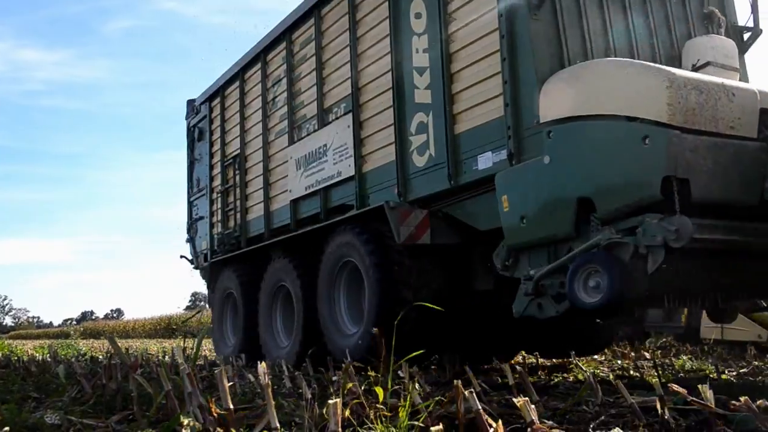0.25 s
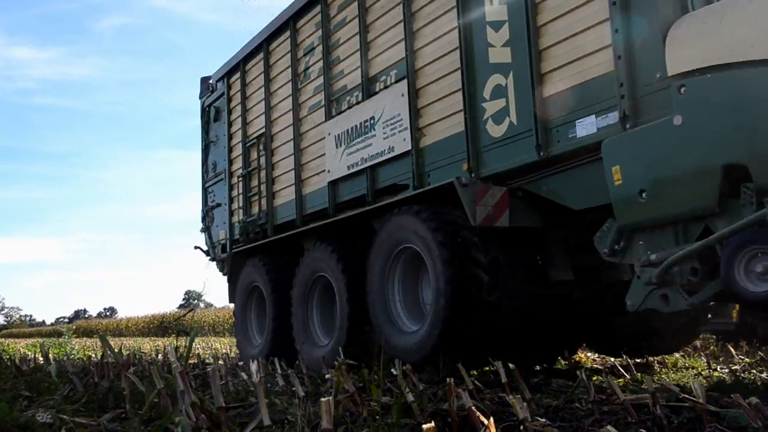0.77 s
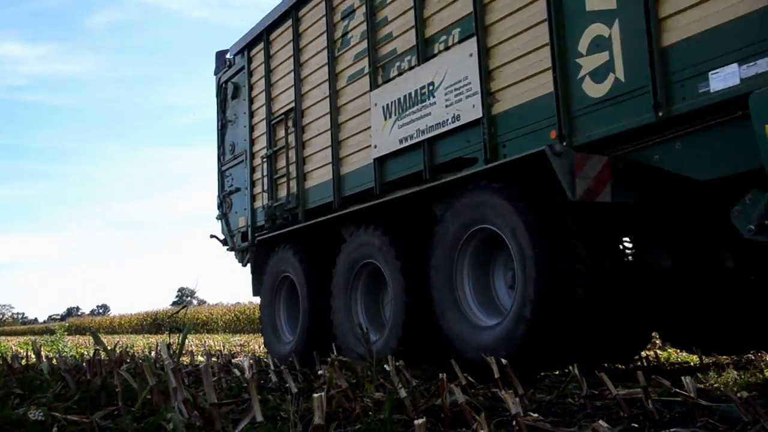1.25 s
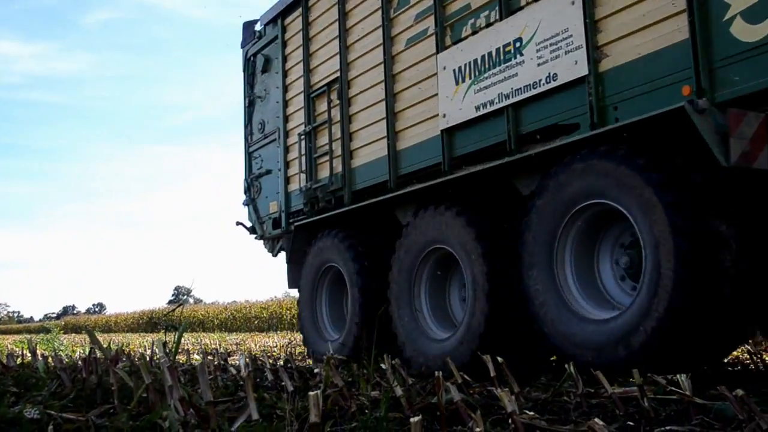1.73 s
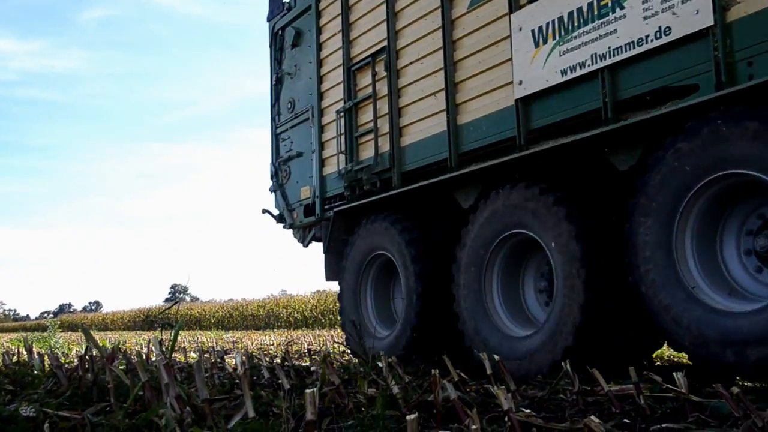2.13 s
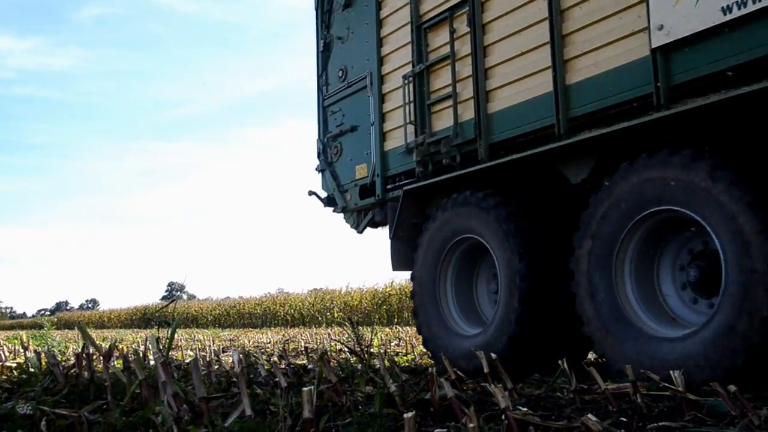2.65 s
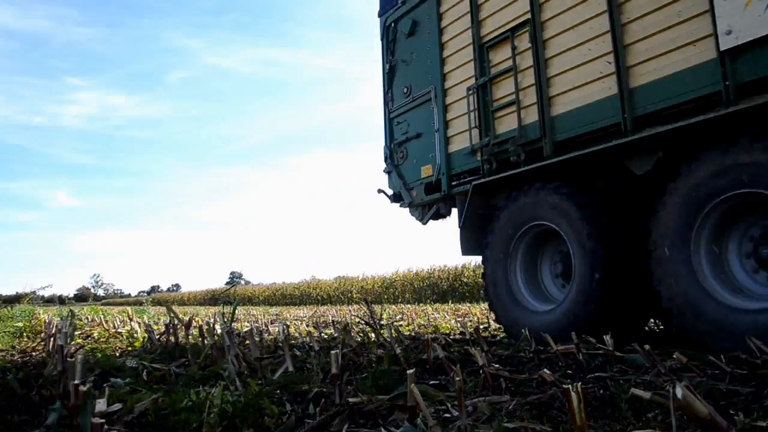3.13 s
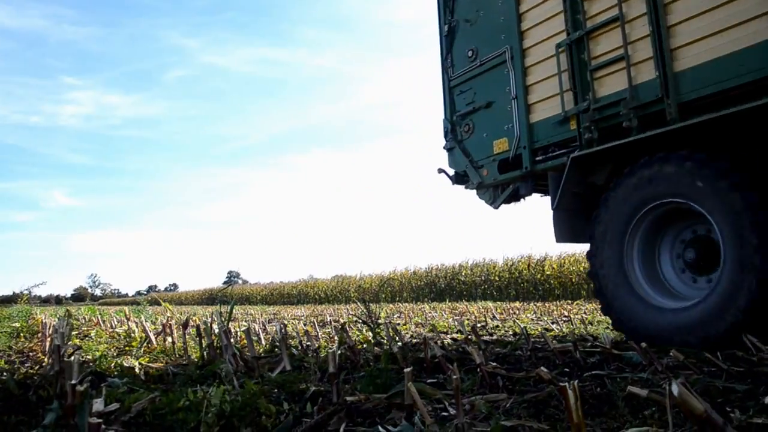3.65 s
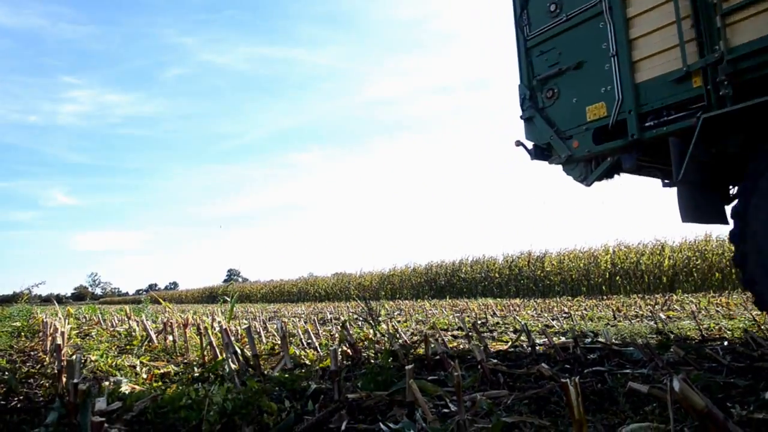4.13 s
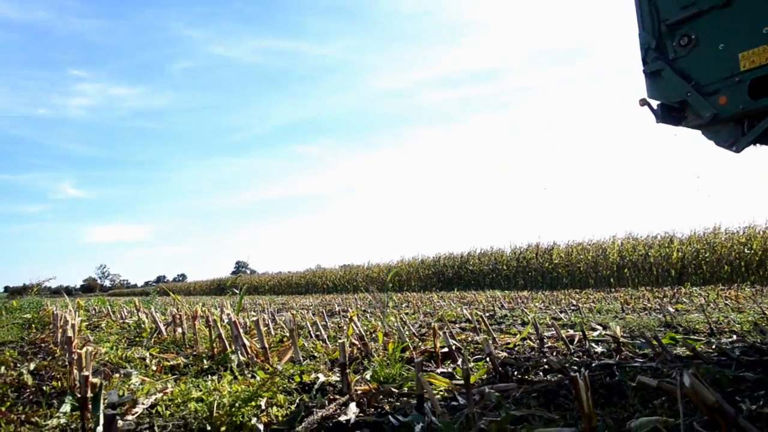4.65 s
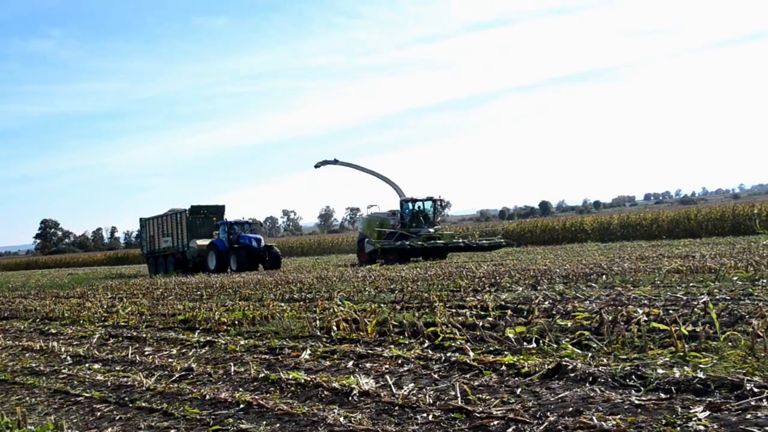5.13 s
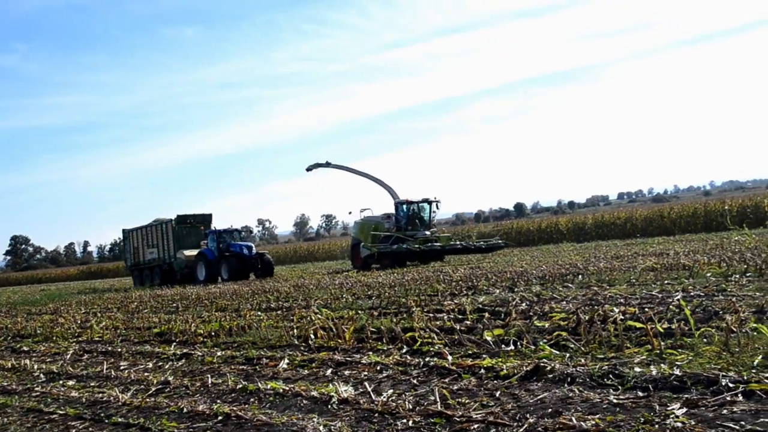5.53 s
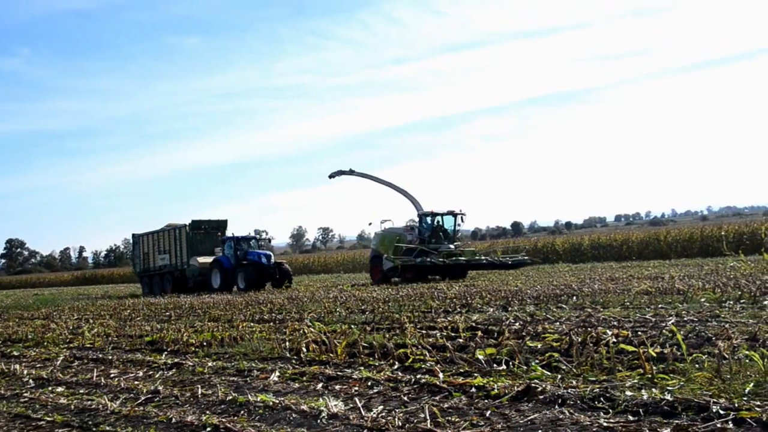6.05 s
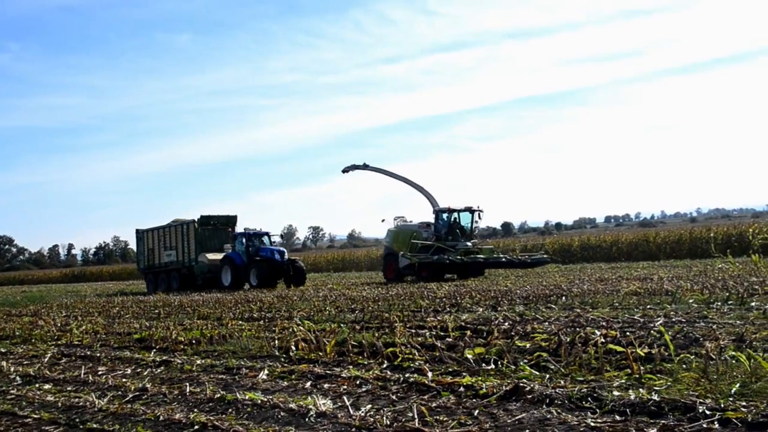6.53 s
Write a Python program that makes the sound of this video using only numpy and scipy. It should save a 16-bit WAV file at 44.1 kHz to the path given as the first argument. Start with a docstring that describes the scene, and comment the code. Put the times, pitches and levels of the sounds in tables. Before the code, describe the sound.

In a maize field, a forage harvester and a tractor hauling a wagon pass close to the microphone. The chopping drum hums unevenly over a diesel roar, the wagon booms hollowly, and dry leaves and stalks crunch and snap under the tyres. The sound cuts off abruptly, then the machines fade back in far away, a dull roar with a higher whine, as wind gusts buffet the microphone.

```python
"""A maize stubble field: a tractor pulls a silage wagon past while a forage harvester chops beside it.
The knife drum hums, the diesel roars, the wagon box booms, leaves and stalks crack under the tyres.
After an abrupt cut the field fades in again with the machines far off, the unloaded drum whining higher,
and gusts of wind thump on the microphone."""
import sys
import numpy as np
from scipy import signal
from scipy.fft import rfft, irfft
from scipy.io import wavfile

SR = 44100
rng = np.random.default_rng(int(sys.argv[2]) if len(sys.argv) > 2 else 0)


def store_wav(level_fs):
    """Save 16-bit WAV to argv[1]."""
    pcm = np.round(np.clip(np.atleast_2d(level_fs), -1, 1) * 32767)
    wavfile.write(sys.argv[1], SR, pcm.T.astype(np.int16))


N = 299439
TIME = np.arange(N) / SR
FREQS = np.maximum(np.fft.rfftfreq(N, 1 / SR), 1)
CUT_S, FADE_END_S = 4.890, 5.281   # the close pass ends; the far view is fully up


def from_db(db):
    """Decibels to gain."""
    return 10 ** (np.asarray(db) / 20)


def unit_rms(x):
    """Scale to unit power."""
    return x / np.sqrt(np.mean(x ** 2) + 1e-20)


def automation(rows):
    """Breakpoints to one curve for each column after the time."""
    times, *columns = np.transpose(rows)
    return [np.interp(TIME, times, column) for column in columns]


def swell(start, length, attack, release):
    """Rise to 1 by the start, hold for the length, fall to 0."""
    return np.clip(np.minimum((TIME - start) / attack, (start + length - TIME) / release) + 1, 0, 1)


def drift(rate_hz):
    """A smooth random wobble, mostly slower than the rate; rms 1."""
    return unit_rms(irfft(rfft(rng.standard_normal(N)) / (1 + (FREQS / rate_hz) ** 2), N))


def equalise(x, curve, notches=()):
    """Shape a signal with an EQ curve and optional narrow notches; rms 1."""
    hz, db = np.transpose(curve)
    shape_db = np.interp(np.log(FREQS), np.log(hz), db)
    for centre, width, depth in notches:
        shape_db = shape_db + depth / (1 + ((FREQS - centre) / width) ** 2)
    return unit_rms(irfft(rfft(x) * from_db(shape_db), N))


def phase(hz):
    """Running angle of a steady or gliding pitch."""
    return 2 * np.pi * np.cumsum(hz * np.ones(N)) / SR


def tone(angle, db):
    """A sine of this rms level."""
    return np.sqrt(2) * from_db(db) * np.sin(angle)


def grains(per_s, spread_db):
    """Random clicks of uneven size and sign; rms 1."""
    sizes = from_db(spread_db * np.minimum(rng.exponential(1, N), 4))
    return unit_rms(sizes * rng.choice([-1, 1], N) * (rng.random(N) < per_s / SR))


def clicks(hits, curve):
    """One short equalised click for each (time [s], peak [dB])."""
    spikes, impulse = np.zeros(N), np.zeros(N)
    impulse[N // 2] = 1
    for s, db in hits:
        spikes[round(s * SR)] = from_db(db)
    click = equalise(impulse, curve)[N // 2 - 200:N // 2 + 201]
    return signal.fftconvolve(spikes, click / click.max(), "same")


def thumps(hits):
    """Each pressure bump dips and swings back within one cycle."""
    out = np.zeros(N)
    for s, db, hz in hits:
        span = slice(max(round((s - .05) * SR), 0), round((s + .05) * SR))
        swing = 2 * np.pi * hz * (TIME[span] - s)
        bump = swing / (1 + (swing * 0.59) ** 2) ** 2
        out[span] += from_db(db) * bump / np.abs(bump).max()
    return out


# pitch of the loaded drum: (time [s], knife rate [Hz])
DRUM_PITCH = [(0, 340.5), (.2, 337.5), (.55, 342.5), (.78, 343.8), (1.1, 339), (1.3, 341.5), (1.52, 339),
              (1.62, 341), (1.76, 338), (2, 341), (2.3, 344.5), (2.6, 341.5), (3, 337.8), (3.45, 338.3),
              (3.8, 337.3), (4.25, 339.8), (4.6, 337.5), (4.89, 336.5)]
# its hum at the knife rate: (time [s], level [dB])
DRUM_HUM = [(0, -25), (.21, -34), (.38, -26.5), (.52, -24), (.76, -21.5), (.94, -21.5), (1.02, -21.5),
            (1.17, -20.5), (1.27, -24.5), (1.36, -16.5), (1.45, -26), (1.64, -27), (1.73, -36.5),
            (2, -32.5), (2.07, -24), (2.17, -24.5), (2.24, -29.5), (2.3, -28), (2.45, -32.5), (2.78, -37),
            (2.97, -27), (3.09, -20), (3.25, -21.5), (3.55, -25), (3.78, -30), (3.98, -25), (4.17, -38),
            (4.27, -28.5), (4.45, -25.5), (4.66, -25), (4.74, -36), (4.81, -25.5), (4.87, -34)]
# partials a fourth below, a third above and an octave above the hum: (time [s], level [dB])
FOURTH_BELOW = [(0.0, -33), (0.2, -27.5), (0.76, -41), (0.8, -34), (1.53, -68), (1.57, -45), (2.82, -29),
                (3.2, -56), (3.44, -26.5), (3.96, -44), (4.03, -30.5), (4.49, -24), (4.54, -40),
                (4.87, -37)]
THIRD_ABOVE = [(0, -44), (1.0, -36), (1.35, -48), (1.45, -36), (2.02, -34), (2.15, -40.5), (3.1, -44),
               (4.89, -45.5)]
OCTAVE_ABOVE = [(0, -39), (.17, -36.5), (.32, -43), (.39, -30.5), (.7, -38.5), (.8, -31.5), (.95, -39),
                (1.08, -44), (2.4, -41), (2.65, -36.5), (2.9, -36), (3, -39.5), (3.55, -40.5),
                (3.97, -32.5), (4.13, -47), (4.5, -40.5), (4.65, -35.5), (4.76, -48), (4.85, -35.5)]
# weak undertones at 1/8 and 3/8 of the knife rate: (level [dB])
UNDERTONES = [-53, -39.5]

def chopper_drum():
    """Knives pass the shear bar; the uneven flow of crop makes each partial waver in its own way."""
    knife_hz, = automation(DRUM_PITCH)
    hum_db, = automation(DRUM_HUM)
    fourth_db, = automation(FOURTH_BELOW)
    third_db, = automation(THIRD_ABOVE)
    octave_db, = automation(OCTAVE_ABOVE)
    angle = phase(knife_hz) + 0.27 * drift(11)
    hum = tone(angle, hum_db + 1.12 * drift(13))
    multiples = [3 / 4, 5 / 4, 2, 1 / 8, 3 / 8]
    levels = [fourth_db, third_db, octave_db, *UNDERTONES]
    partials = sum(tone(multiple * angle + .28 * drift(20), db + 1.6 * drift(20))
                   for multiple, db in zip(multiples, levels))
    # the rough third harmonic is beamed and sweeps by once, at 3.2 s
    beam_db = -43.5 - 9 * np.abs(TIME - 3.2)
    beam = tone(phase(3 * knife_hz), beam_db) * (1 + 0.22 * drift(25))
    return hum + partials + beam


# fader ride on the close engine roar: (time [s], relative level [dB])
ROAR_RIDE = [(0.0, -30), (1.47, -33), (1.49, -31.5), (2.88, -30), (3.39, -34.5), (3.97, -34.5),
             (4.15, -35.5), (4.74, -34), (4.85, -31.5)]
# midrange roar and low rolling rumble: (frequency [Hz], relative gain [dB])
ROAR_EQ = [(150, -3.5), (400, 0), (600, -1), (800, -0.5), (1000, 1.5), (1200, -0.5), (1600, -1), (2200, -7),
           (3000, -20.5), (4000, -26.5), (5400, -31), (6500, -35.5), (9000, -42.5), (15000, -62.5)]
RUMBLE_EQ = [(20, -29), (45, -12), (62, -11.5), (90, -7), (160, -1), (230, -3), (310, -2), (400, -7),
             (520, -14), (800, -18.5), (2000, -53), (8000, -93.5)]

def tractor(firing_hz=101.7):
    """The diesel's clatter pulses with firing and drum; firing tone and rumble sink as it pulls away."""
    roar_db, = automation(ROAR_RIDE)
    knife_hz, = automation(DRUM_PITCH)
    firing_db = -32 - 2.0 * TIME + 1.5 * drift(6.5)
    rumble_db = -27 - 0.72 * TIME + drift(17)
    firing_angle = phase(firing_hz) + 0.72 * drift(4.7)
    chug = np.cos(phase(knife_hz / 4))
    pulsing = 1 + 0.065 * np.cos(firing_angle) + 0.014 * chug
    clatter = rng.standard_normal(N) + .5 * grains(per_s=700, spread_db=3.3)
    flicker = from_db(0.72 * drift(32))
    roar = from_db(roar_db + 1.5) * equalise(clatter * pulsing * flicker, ROAR_EQ)
    rumble = from_db(rumble_db) * equalise(rng.standard_normal(N) * (1 + 0.21 * chug), RUMBLE_EQ)
    return tone(firing_angle, firing_db) + roar + rumble


# fader rides on the tyre bed: (time [s], relative crunch level [dB], relative chaff level [dB])
STUBBLE_RIDE = [(0, -47, -64), (.3, -44, -64.5), (1.6, -50.5, -59.5), (2.1, -53.5, -61.5),
                (2.7, -47.5, -61), (3.05, -49, -63.5), (3.65, -53, -73), (4.6, -53, -75),
                (4.89, -50.5, -66)]
# crisp crunch and airy chaff: (frequency [Hz], relative gain [dB])
CRUNCH_EQ = [(300, -30.5), (1500, -14), (3000, 11), (4200, 4), (5600, -1), (6600, -12.5), (8200, -5.5),
             (10000, -24), (13500, -13), (15500, -25)]
CHAFF_EQ = [(2000, -29), (5000, -9.5), (6600, -0.5), (8000, 3.5), (10300, 2.5), (11600, -1.5), (13500, -5),
            (15500, -13)]

def stubble():
    """Dry stubble crunches in clumps under the tyres while chaff hisses."""
    crunch_db, chaff_db = automation(STUBBLE_RIDE)
    clumps = drift(30)
    fibres = grains(per_s=1300 * from_db(3.5 * clumps), spread_db=2.3) + 0.7 * rng.standard_normal(N)
    crunch = from_db(crunch_db - 2.5 + clumps) * equalise(fibres, CRUNCH_EQ)
    flakes = grains(per_s=3500 * from_db(4.6 * clumps), spread_db=3.4) + rng.standard_normal(N)
    chaff = from_db(chaff_db + 2.5 + 0.88 * drift(25)) * equalise(flakes, CHAFF_EQ)
    return crunch + chaff


# big leaves crushed under the tyres: (time [s], relative peak [dB])
LEAF_HITS = [(0.1186, -30), (0.157, -35), (0.178, -45), (0.247, -30), (0.285, -41), (0.2952, -33),
             (0.311, -27.5), (0.415, -35), (0.4728, -38), (0.5457, -35), (0.6614, -35), (0.8914, -38),
             (1.0161, -34), (1.0899, -34), (1.496, -44), (2.6414, -37), (2.8744, -35), (3.175, -43),
             (3.37, -39), (3.975, -40), (4.0437, -32)]
# their papery bite: (frequency [Hz], relative gain [dB])
LEAF_EQ = [(500, -30), (2200, 13), (3500, 1.5), (5000, 1.5), (6600, -13), (8200, -4.5), (11000, -18.5),
           (13500, -12), (16000, -26)]

def leaves(small_per_s=5.5, t60_s=0.06):
    """A big leaf snaps, then its fibres tear in a dying burst; small ones just tear, at random."""
    _, chaff_db = automation(STUBBLE_RIDE)
    onsets = rng.integers(0, round(CUT_S * SR), round(small_per_s * CUT_S))
    small_hits = zip(TIME[onsets], chaff_db[onsets] + 11.5)
    bursts = sum((TIME >= s) * from_db(db - 60 * np.clip((TIME - s) / t60_s, 0, 2))
                 for s, db in [*LEAF_HITS, *small_hits])
    tearing = bursts * equalise(grains(per_s=2200, spread_db=2.0), LEAF_EQ)
    return from_db(1.5) * clicks(LEAF_HITS, LEAF_EQ) + from_db(-5) * tearing


# hollow booms on bumps: (time [s], hold [s], level [dB], pitch [Hz])
BOX_BOOMS = [(0.469, 0.067, -30, 186.5), (1.164, 0.49, -29.5, 152.9), (1.477, 0.42, -36, 493),
             (2.028, 0.089, -32, 206.3), (2.686, 0.16, -30.5, 176), (3.237, 0.14, -31, 188.4),
             (4.542, 0.29, -34.5, 127)]
# thuds over ruts: (time [s], peak [dB], centre [Hz])
RUT_THUDS = [(2.757, -24, 182), (3.8055, -14.5, 150), (3.889, -31, 260.5)]

def wagon_box(width_to_pitch=0.14):
    """The big box booms in narrow bands of noise on the uneven ground and thuds over ruts."""
    out = thumps(RUT_THUDS)
    for s, hold, db, hz in BOX_BOOMS:
        angle, width_hz = phase(hz), width_to_pitch * hz
        ringing = drift(width_hz) * np.cos(angle) + drift(width_hz) * np.sin(angle)
        out += from_db(db) * swell(s, hold, attack=0.081, release=0.39) * ringing
    return out


def chute(loudest_s=2.26, fall_db_per_s=9.5, ring_hz=2480):
    """Chopped crop rattles up the ringing chute, loudest as it sweeps by."""
    db = -45 - fall_db_per_s * np.abs(TIME - loudest_s)
    resonance = signal.iirpeak(ring_hz, Q=ring_hz / 470, fs=SR)
    rattle = grains(per_s=4000, spread_db=4.3)
    ringing = signal.lfilter(*resonance, signal.lfilter(*resonance, rattle))
    return from_db(db) * unit_rms(ringing)


# flares of the drum's squeal: (time [s], hold [s], level [dB])
SQUEAL_FLARES = [(1.912, 0.032, -32), (2.05, 0.18, -40), (2.292, 0.11, -35)]

def drum_squeal(pitch_hz=1374):
    """A rough squeal near four times the knife rate flares up as the harvester goes by."""
    flares = [from_db(db) * swell(s, hold, attack=0.017, release=0.026) for s, hold, db in SQUEAL_FLARES]
    return np.max(flares, axis=0) * tone(phase(pitch_hz) + 0.5 * drift(25), 2 * drift(30))


# thick stalks snapping: (time [s], peak [dB], tube pitch [Hz], burst decay t60 [s])
STALK_SNAPS = [(3.0576, -21, 3500, 0.013), (3.0672, -22, 2750, 0.014), (4.0446, -33, 3200, 0.023)]
# resonances of the tube: (multiple of its pitch [ratio], width [Hz], relative level [dB])
TUBE_MODES = [(.72, 499, 0), (1, 503.7, 0), (1.85, 796, -13), (3.2, 2975, -33)]

def stalks():
    """A short burst of breaking fibres rings the hollow stalk."""
    out, age = np.zeros(N), np.arange(SR // 16) / SR
    for s, db, hz, t60 in STALK_SNAPS:
        burst = rng.standard_normal(len(age)) * from_db(-60 * age / t60)
        snap = 0
        for k, (multiple, width, mode_db) in enumerate(TUBE_MODES):
            centre = hz * multiple
            ring = signal.lfilter(*signal.iirpeak(centre, centre / width, fs=SR), burst)
            snap = snap + (-1) ** k * from_db(mode_db) * ring
        start = round(s * SR)
        out[start:start + len(age)] += from_db(db) * snap / np.abs(snap).max()
    return out


# gusts on the microphone: (time [s], hold [s], relative level [dB])
WIND_GUSTS = [(4.935, 0.048, -17), (5.283, 0.15, -24.5), (5.465, 0.032, -28), (5.59, .11, -25),
              (5.703, 0.1, -23), (5.814, .03, -23.5), (5.933, 0.065, -28), (6.03, 0.11, -25),
              (6.186, 0.051, -26.5), (6.297, .02, -28), (6.374, 0.16, -25.5), (6.654, 0.083, -25.5)]
# the wind ducks between gusts: (time [s], hold [s], level change [dB])
WIND_LULLS = [(5.02, 0.14, -8), (5.307, 0.013, -7), (5.435, .02, -11), (5.528, 0.026, -8), (5.78, 0.01, -8),
              (5.905, 0.009, -3), (6, 0.0082, -5), (6.14, 0.022, -7), (6.33, .025, -6), (6.511, 0.069, -11)]
# dark smooth flow and brighter torn eddies: (frequency [Hz], relative gain [dB])
FLOW_EQ = [(20, -27), (50, -19), (85, 0), (140, 3.5), (220, -2.5), (330, -4.5), (500, -14.5), (800, -20),
           (1300, -35), (4000, -65), (12000, -100)]
FLUTTER_EQ = [(20, -47), (60, -16), (200, 8.5), (330, 3.5), (550, -1.5), (800, -10), (1200, -24),
              (2500, -50), (6000, -56), (12000, -89)]
# punches from the hardest eddies: (time [s], relative peak [dB], centre [Hz])
EDDY_THUMPS = [(5.2189, -6, 320), (5.2893, -13.5, 300), (5.3279, -14, 370), (5.3416, -12.5, 340),
               (5.3623, -11, 320), (5.3869, -10, 290), (5.3998, -9.5, 430), (5.4138, -17, 260),
               (5.492, -16, 330), (5.5665, -13, 430), (5.6003, -19, 300), (5.6144, -17, 330),
               (5.6362, -6.5, 383), (5.6459, -9, 160), (5.6535, -12, 190), (5.6803, -8, 270),
               (5.6905, -16, 260), (5.7034, -11, 380), (5.7195, -12, 210), (5.7267, -8, 200),
               (5.7331, -15.5, 300), (5.7417, -7, 209), (5.7569, -17, 330), (5.7695, -7, 340),
               (5.8049, -13, 300), (5.8105, -23, 240), (5.8226, -9.5, 320), (5.8298, -10.5, 268),
               (5.8838, -16.5, 520), (5.9245, -13.5, 210), (5.9659, -17, 320), (6.0792, -29, 290),
               (6.0986, -12, 180), (6.1120, -12, 220), (6.1357, -9, 305), (6.1959, -18, 230),
               (6.3132, -14.5, 330), (6.3829, -12.5, 290), (6.439, -15, 270), (6.4598, -11.5, 270),
               (6.4665, -9, 462), (6.4945, -15, 170), (6.5025, -14.5, 260), (6.6015, -13, 199),
               (6.679, -16, 131), (6.7103, -9, 380), (6.7239, -15, 220), (6.7377, -17, 330)]
# sharp cracks within the gusts: (time [s], relative peak [dB])
GUST_CRACKS = [(5.6354, -38), (5.6785, -44), (5.7014, -43), (5.7309, -46), (5.7683, -53), (5.8295, -51),
               (6.1344, -54)]
# their broad midrange snap: (frequency [Hz], relative gain [dB])
CRACK_EQ = [(100, 4), (700, 6), (2000, 6), (5000, -1), (9000, -12), (15000, -16)]

def wind(breeze_db=-31):
    """Lumpy turbulence on the microphone; stronger gusts tear into flutter, thumps and cracks."""
    gusts = [(db - breeze_db) * swell(s, hold, attack=0.049, release=0.06) for s, hold, db in WIND_GUSTS]
    lulls = sum(db * swell(s, hold, attack=0.0074, release=0.0074) for s, hold, db in WIND_LULLS)
    wind_db = breeze_db + np.max(gusts, axis=0) + lulls
    flow_db = wind_db - 3.5
    flutter_db = flow_db + 0.17 * np.clip(wind_db + 19, -10, 6)   # harder wind is brighter
    lumps = from_db(1.6 * drift(40))
    flow = from_db(flow_db) * equalise(rng.standard_normal(N) * lumps, FLOW_EQ)
    flutter = from_db(flutter_db) * equalise(grains(per_s=350, spread_db=3.1) * lumps, FLUTTER_EQ)
    low_cut = signal.butter(1, 60, "high", fs=SR, output="sos")
    buffets = signal.sosfiltfilt(low_cut, thumps(EDDY_THUMPS))
    return flow + flutter + from_db(-2.5) * buffets + from_db(10.5) * clicks(GUST_CRACKS, CRACK_EQ)


# fader ride on the distant machines: (time [s], relative level [dB])
FAR_RIDE = [(5.3, -39), (5.39, -38), (5.626, -38), (5.768, -41), (6.05, -37), (6.79, -34.5)]
# their dull roar and thin hiss: (frequency [Hz], relative gain [dB])
FAR_ROAR_EQ = [(30, -7), (90, 10.5), (200, 6.5), (400, -13.5), (700, -6.5), (950, -1), (1220, -4.5),
               (1520, 3.5), (2050, -3), (2700, -15), (3400, -36), (5000, -59.5), (12000, -84)]
FAR_HISS_EQ = [(1800, -3.5), (3000, 4), (4100, -5), (5000, -11.5), (6000, -17), (7500, -21.5),
               (9500, -27.5), (12000, -39), (15000, -47)]
# bands cancelled by the ground reflection: (centre [Hz], half-width [Hz], depth [dB])
GROUND_NOTCHES = [(1730, 120, -12.5), (2330, 120, -4.5), (3600, 140, -4.5)]
# faint whines of drum and gears that follow the ride: (pitch [Hz], relative level [dB])
GEAR_TONES = [(134.6, -8), (1347.5, -15.5), (1897, -22), (2597.4, -32.5), (3340.4, -39), (4040.7, -38.5)]

def distant_machines():
    """Far roar and hiss throb with the engines, hollowed by the ground reflection; gears sing faintly."""
    ride_db, = automation(FAR_RIDE)
    swing_db = ride_db - ride_db[TIME > FADE_END_S].mean()
    hiss_db = -52.5 + 1.35 * swing_db   # the hiss swings more widely than the roar
    roar_db = ride_db + 6.5 + .5 * drift(7.8)
    throb = 1 + 0.056 * np.cos(phase(74.2)) + 0.037 * np.cos(phase(120)) + 0.048 * np.cos(phase(23))
    roar = from_db(roar_db) * equalise(rng.standard_normal(N) * throb, FAR_ROAR_EQ, GROUND_NOTCHES)
    hiss = from_db(hiss_db) * equalise(rng.standard_normal(N) * throb, FAR_HISS_EQ, GROUND_NOTCHES)
    gears = sum(tone(phase(hz * (1 + 0.00058 * drift(5.8))), ride_db + db + 0.66 * drift(4))
                for hz, db in GEAR_TONES)
    return roar + hiss + from_db(4) * gears


# fader ride on the empty drum's whine: (time [s], level [dB])
WHINE_RIDE = [(5.3, -41.5), (5.52, -38.3), (5.85, -41.5), (6.35, -39.5), (6.5, -47), (6.79, -40.5)]
# its harmonics: (multiple of the knife rate [ratio], level against the ride [dB])
WHINE_HARMONICS = [(2, .5), (3, -11), (4, -3)]

def unloaded_drum(knife_hz=370.95):
    """With no crop to cut, the drum spins faster and whines in clean harmonics."""
    angle = phase(knife_hz) + .025 * drift(10)
    whine_db, = automation(WHINE_RIDE)
    return sum(tone(multiple * angle, whine_db + db + 1.5 * drift(5.2))
               for multiple, db in WHINE_HARMONICS)


# the distant harvester's turbocharger: (time [s], pitch [Hz], level [dB])
TURBO_WHISTLE = [(5.3, 11700, -108), (5.5, 11820, -92), (5.65, 12050, -101), (5.95, 12600, -114),
                 (6.25, 12830, -104), (6.45, 12940, -94), (6.79, 13100, -89.5)]

def turbo():
    """A faint thin whistle climbs as the engine takes up load."""
    hz, db = automation(TURBO_WHISTLE)
    return tone(phase(hz + 10 * drift(20)), db + 2 * drift(12))


# distant puffs of noise: (time [s], hold [s], level [dB], centre [Hz], width [Hz])
FAR_RUSHES = [(5.63, 0.013, -43, 2020, 300), (6.457, 0.016, -30.5, 1080, 300)]

def rushes(edge_s=0.0073):
    """Two brief rushes of narrow-band noise stand out of the far roar."""
    out = np.zeros(N)
    for s, hold, db, hz, width in FAR_RUSHES:
        band = signal.butter(2, [hz - width / 2, hz + width / 2], "band", fs=SR, output="sos")
        rush = unit_rms(signal.sosfilt(band, rng.standard_normal(N)))
        out += from_db(db) * swell(s, hold, edge_s, edge_s) * rush
    return out


def scene(fade_db_per_s=113.5):
    """The close pass, a hard cut, then the far view fades up from a quiet floor; mono."""
    near = chopper_drum() + tractor() + stubble() + leaves() + wagon_box()
    near += chute() + drum_squeal() + stalks()
    fade_in = from_db(fade_db_per_s * np.minimum(TIME - FADE_END_S, 0)) + from_db(-40)
    far = fade_in * (wind() + distant_machines() + unloaded_drum() + turbo() + rushes())
    after_cut = np.clip((TIME - CUT_S) / .002 + .5, 0, 1)   # 2 ms crossfade
    return (near * (1 - after_cut) + far * after_cut)[None]


def record(dry, ceiling=.305, cutoff_hz=15600):
    """The strongest peaks overload into a soft clip; a steep low-pass takes off the top."""
    limited = dry / (1 + (dry / ceiling) ** 10) ** (1 / 10)
    return signal.sosfilt(signal.ellip(12, .1, 80, cutoff_hz, fs=SR, output="sos"), limited)


dry = scene()
out = record(dry)
store_wav(out)
```